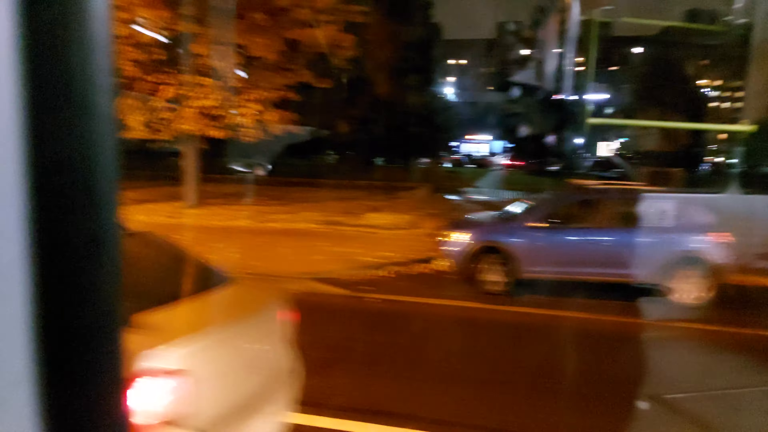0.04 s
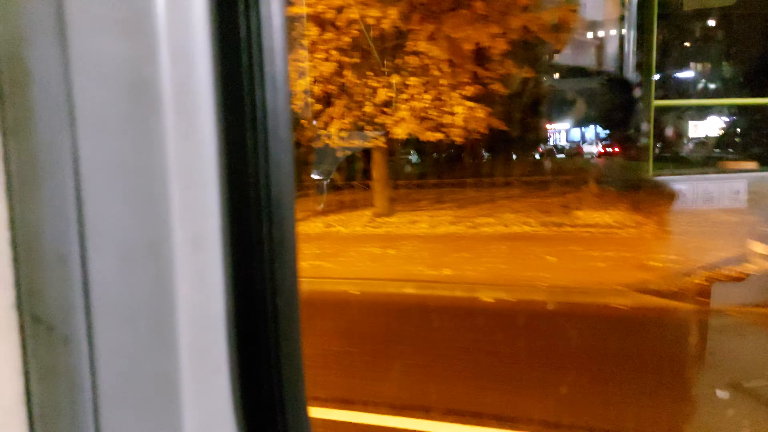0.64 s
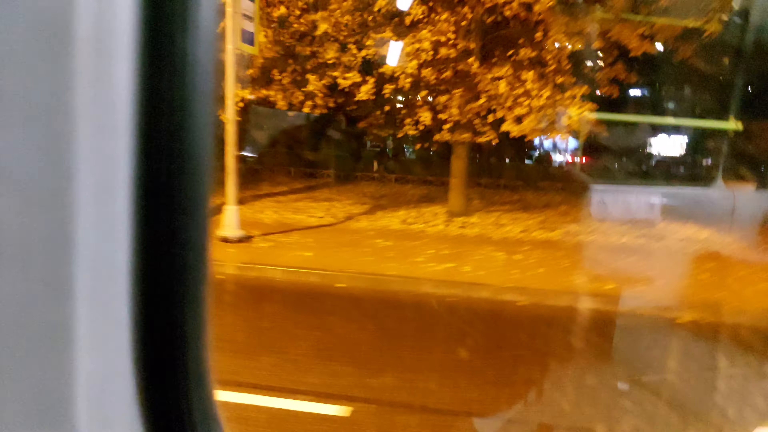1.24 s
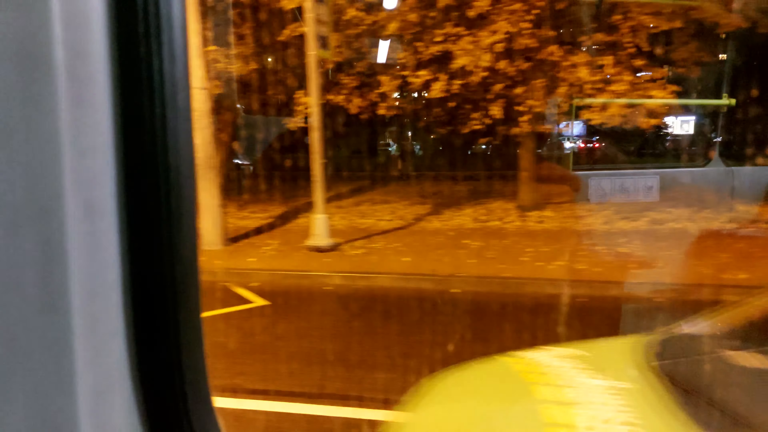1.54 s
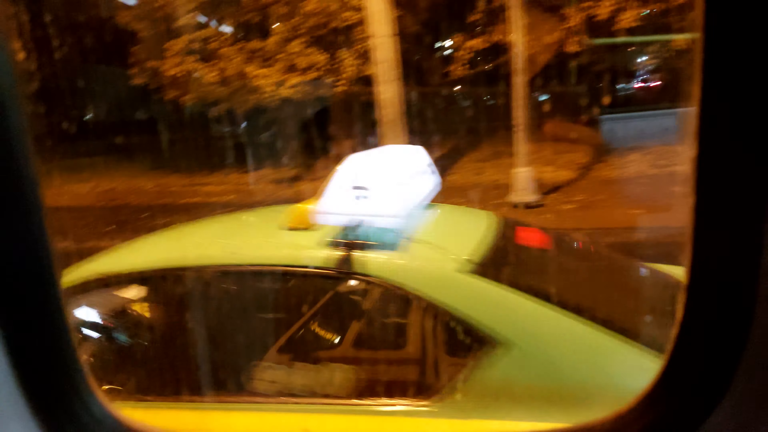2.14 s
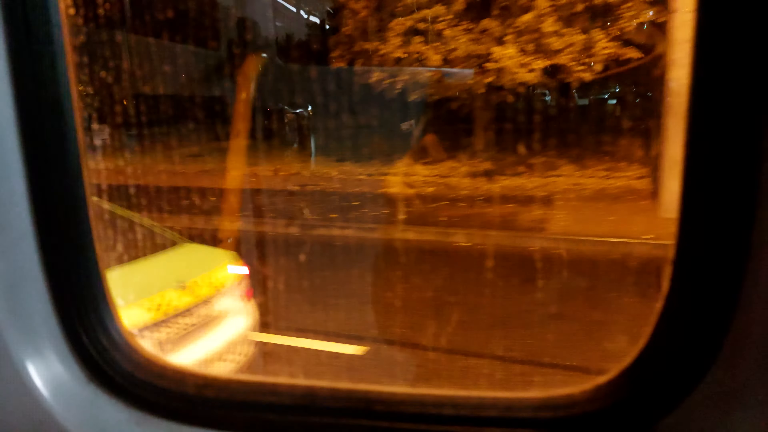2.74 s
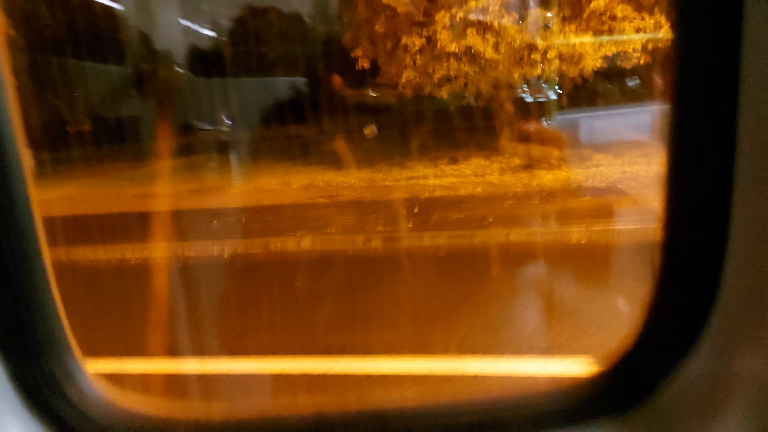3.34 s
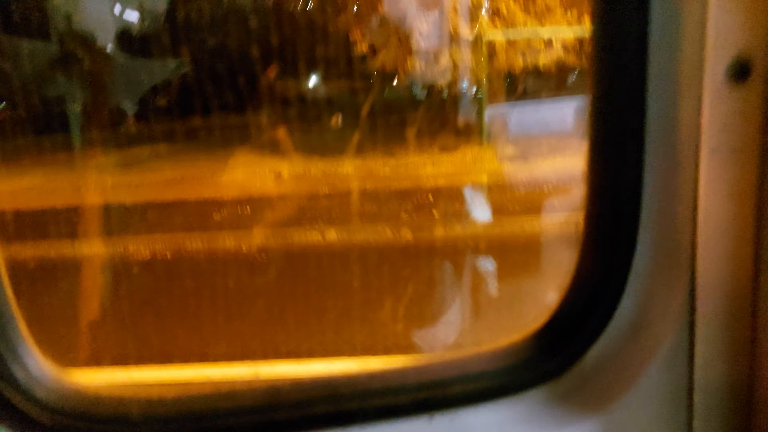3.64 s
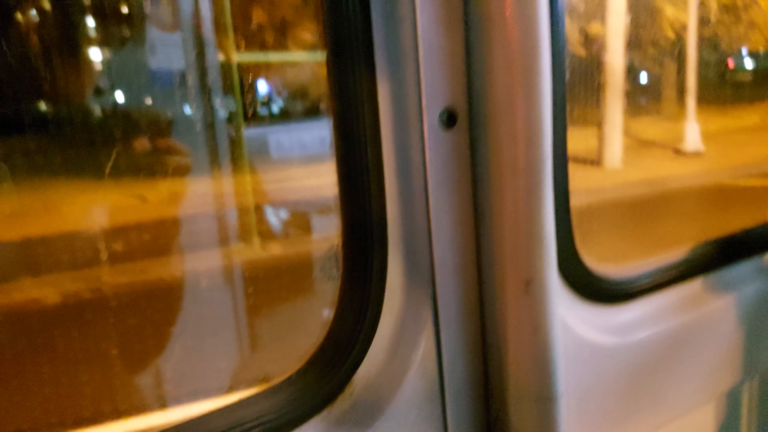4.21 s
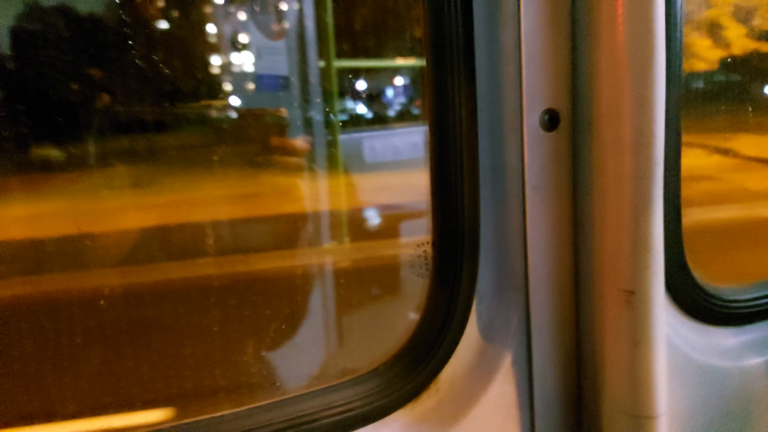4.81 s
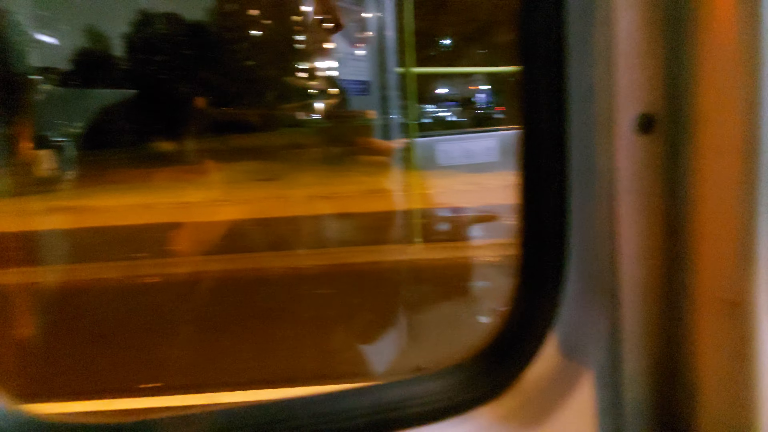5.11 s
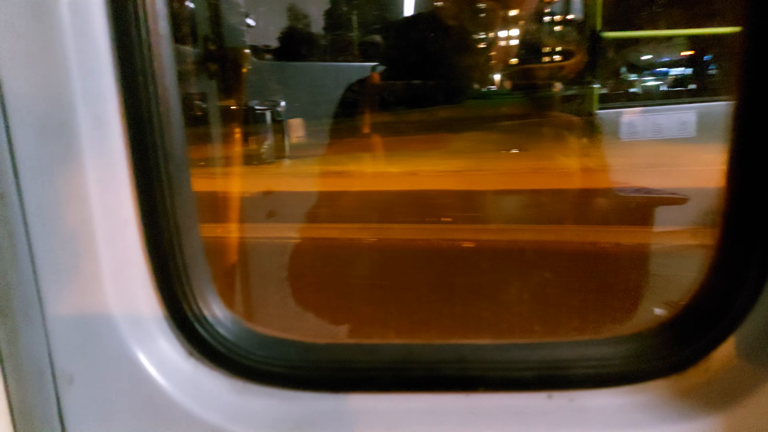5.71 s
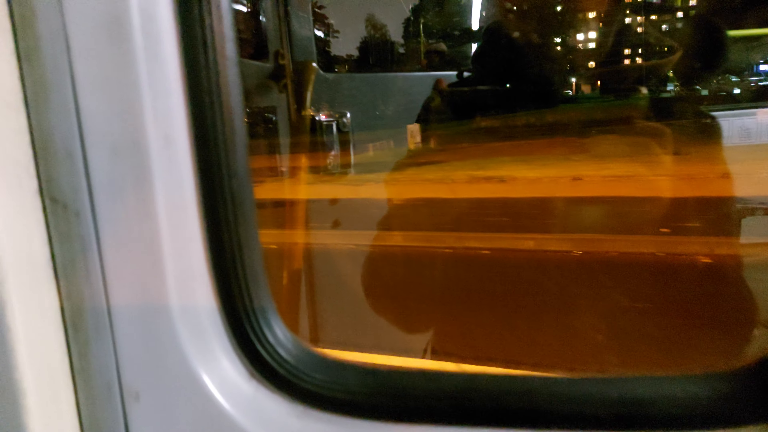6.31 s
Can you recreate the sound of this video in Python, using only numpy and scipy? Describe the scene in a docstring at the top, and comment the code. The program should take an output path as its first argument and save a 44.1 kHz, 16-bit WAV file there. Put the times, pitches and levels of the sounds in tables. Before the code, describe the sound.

Inside a slowing tram, a booming whine falls over rumbling wheels while loose metal rattles, until the brakes start to squeal.

```python
"""A falling whine booms over the rumble of wheels, heard inside a tram that slows for a stop.
The whine comes from the drive and swells wherever its pitch makes the tram's body ring. A fan hums,
loose metal fittings buzz and clack, and bumps in the track thud. Sliding wheels sing briefly and
a car passes outside. At the end the brakes scrape and begin to squeal.
The small, hard cabin smears every knock with quick echoes."""
import sys
import numpy as np
from scipy import signal
from scipy.fft import rfft, irfft
from scipy.io import wavfile

SR = 44100
rng = np.random.default_rng(int(sys.argv[2]) if len(sys.argv) > 2 else 0)


def file_out(sig):
    """Save sig as 16-bit WAV at sys.argv[1]."""
    # one column per channel
    cols = np.atleast_2d(sig).T
    # limit, then scale
    lim = np.clip(cols, -1, 1)
    pcm = np.round(lim * 32767).astype(np.int16)
    wavfile.write(sys.argv[1], SR, pcm)


N = 289296
T = np.arange(N) / SR
FREQS = np.fft.rfftfreq(N, 1 / SR)

# The drive shaft as the tram brakes, coasts and brakes again. Each row: time in seconds, turns a second.
SHAFT_SPEED = [(0, 113.1), (2.1, 90.7), (2.8, 84), (3.8, 81.7), (4.05, 77.38), (4.55, 72.44), (5.3, 67.4),
               (6.56, 57.05)]
# The tone of a panel's crack and of the brakes' scrape. Each row: frequency in Hz, level in dB.
CRACK_SPECTRUM = [(600, -22), (2150, -11), (2450, 4), (2800, 5), (3250, -4), (3950, 1), (5500, -6),
                  (7200, -4), (8600, -9), (11500, -7), (15500, -16)]


def undb(db):
    """Turn decibels into a number to multiply by."""
    return 10 ** (np.asarray(db) / 20)


def unit(x):
    """Scale a signal to an average (rms) strength of 1."""
    return x / np.sqrt(np.mean(x ** 2))


def over_time(rows):
    """Join (seconds, value) points into one value for every sample."""
    return np.interp(T, *np.transpose(rows))


def over_pitch(rows):
    """Join (Hz, value) points into one value for every frequency, with octaves evenly spaced."""
    hz, value = np.transpose(rows)
    return np.interp(np.log(FREQS + 1), np.log(hz), value)


def shape(x, response):
    """Filter a signal: multiply each frequency by its own gain."""
    return irfft(rfft(x) * response, N)


def resonance(hz, width):
    """The filter of something that rings at one pitch, with gain 1 at that pitch."""
    return 1j * FREQS * width / (hz ** 2 - FREQS ** 2 + 1j * FREQS * width)


def wander(rate):
    """A smooth random curve of strength 1 that changes about rate times a second."""
    steps = rng.standard_normal(N // 16 + 2)
    hz = np.fft.rfftfreq(len(steps), 16 / SR)
    slow = irfft(rfft(steps) * np.exp(-(hz / rate) ** 2) * (hz > 0), len(steps))
    return unit(np.interp(T, np.linspace(0, T[-1], len(slow)), slow))


def cabin_noise(response):
    """Filtered noise from all sides: left and right are alike in the bass, unlike in the treble."""
    # Each row: frequency in Hz, how alike left and right are (1 is the same, 0 is unrelated).
    likeness = [(60, 1), (130, 0.93), (260, 0.79), (500, 0.45), (1000, -0.077), (2000, -0.19),
                (15000, -0.016)]
    alike = np.clip(over_pitch(likeness), -.99, .995)
    mid = shape(rng.standard_normal(N), response * np.sqrt(1 + alike))
    side = shape(rng.standard_normal(N), response * np.sqrt(1 - alike))
    return unit(np.array([mid + side, mid - side]))


def contacts(rate, spread_db):
    """Tiny hits at random moments, about rate a second, a few much harder than the rest."""
    chance = rng.random(N) * SR / rate
    hit = np.flatnonzero(chance < 1)
    impacts = np.zeros(N)
    impacts[hit] = (-1.) ** hit * undb(spread_db * np.minimum(-np.log(chance[hit]), 4))
    return unit(impacts)


def cabin_echo(x, direct, fade_s=0.26):
    """The direct sound, then dense echoes from glass and panels that fall 60 dB in fade_s."""
    t = T[:SR // 2]
    tail = rng.standard_normal((2, len(t))) * undb(-60 * t / fade_s)
    tail /= np.sqrt(np.sum(tail ** 2, axis=1, keepdims=True))
    tail[:, 0] += direct
    return signal.fftconvolve(x[None], tail, axes=1)[:, :N] / np.hypot(1, direct)


def rolling(db, per_octave_db, rough_share, cruise_hz=90):
    """The gain of a sound that grows with speed and with the roughness of the rails."""
    # The track turns smoother near the stop. Each row: time in seconds, roughness in dB.
    roughness = [(0, -0.5), (2, -.5), (4.0, 0.5), (4.6, -2), (5.3, -5.5), (6.0, -2.5), (6.56, -3.5)]
    octaves = np.log2(over_time(SHAFT_SPEED) / cruise_hz)
    return undb(db + per_octave_db * octaves + rough_share * over_time(roughness))


def boom(pitch):
    """The gain of a drive tone: it swells as it crosses a pitch at which the tram's body rings."""
    # Each row: ringing pitch in Hz, width in Hz, level in dB of a tone at that pitch.
    body_modes = [(63.2, 5.8, -18), (67.4, 8.4, -18.5), (125.4, 9.9, -23), (135, 9, -28.5),
                  (149.1, 4.8, -16), (152.5, 6.4, -14.5), (172.84, 10.2, -19.5), (197, 4.3, -25),
                  (211.1, 7.3, -20), (221.5, 23, -17), (359, 40, -42), (471, 40, -47), (629, 30, -43)]
    gains = [undb(db) / (1 + (2 * (pitch - hz) / width) ** 2) for hz, width, db in body_modes]
    return np.sqrt(sum(gain ** 2 for gain in gains))


def drive(flutter_db=2.3, gear_ratio=6.33, gear_blur=.7):
    """Whine, drone and gear tone fall with speed; the shaking wheel frame makes them flutter."""
    speed = over_time(SHAFT_SPEED)
    phase = 2 * np.pi * np.cumsum(speed) / SR
    whine = boom(2 * speed) * undb(flutter_db * wander(11.3)) * np.sin(2 * phase + 0.056 * wander(9.7))
    drone = boom(speed) * undb(flutter_db * wander(23)) * np.sin(phase)
    gear = boom(gear_ratio * speed) * np.sin(gear_ratio * phase + gear_blur * wander(4.2))
    return np.sqrt(2) * (whine + drone + gear)


def wheels(flicker_db=1.34):
    """Rough rails shake the floor; the roar through the air fades faster as the tram slows."""
    # The low rumble and the brighter roar. Each row: frequency in Hz, level in dB.
    rumble_spectrum = [(22, -51), (31, -15.5), (40, -6.5), (52, -4.5), (68, 6.5), (88, -4.5), (110, -0.5),
                       (155, -3), (215, -5), (300, -10), (400, -17), (560, -22), (720, -29.5),
                       (1200, -62.5)]
    roar_spectrum = [(300, -29), (560, -43), (730, 1.5), (950, 1), (1400, -4), (2200, -5.5), (3000, -16.5),
                     (5000, -26), (9000, -27), (15500, -46)]
    rumble = cabin_noise(undb(over_pitch(rumble_spectrum)))
    rumble *= rolling(db=-19.5, per_octave_db=4.0, rough_share=0.73)
    roar = cabin_noise(undb(over_pitch(roar_spectrum)))
    roar *= rolling(db=-42.0, per_octave_db=8.5, rough_share=0.58)
    return rumble + roar * undb(flicker_db * wander(19))


def fan(waver=0.92):
    """The fan and the power converter hum with steady tones that waver a little."""
    # Each row: pitch in Hz, level in dB.
    hum_tones = [(151, -30.5), (176, -44.5), (219, -37), (296, -40.5), (877, -63)]
    hum = 0
    for hz, db in hum_tones:
        level = np.sqrt(2) * undb(db + 2 * wander(2.7))
        hum += level * np.sin(2 * np.pi * hz * T + waver * wander(3.07))
    return hum


def buzz(shake_db=1.5, trim_db=-7, sway_db=1.34):
    """Loose metal chatters in fits, more on rough track; each fitting also comes and goes by itself."""
    # How the fittings ring. Each row: pitch in Hz, width in Hz, relative level in dB.
    fitting_modes = [(2330, 560, 3), (3108, 44, 11), (3270, 10, 6), (4160, 510, 6), (4580, 360, 4.5),
                     (4700, 150, -7), (6500, 180, 7.5), (6830, 830, 0.5), (8370, 200, -3.5),
                     (9100, 120, -6), (10060, 690, -6.5), (12300, 300, -24)]
    # The rustle of trim and seals. Each row: frequency in Hz, level in dB.
    trim_spectrum = [(1200, -24), (2300, -3), (4300, -2.5), (7000, -3), (9000, -13), (11500, -8),
                     (15500, -30)]
    shake = undb(shake_db * wander(26))
    metal = 0
    for hz, width, db in fitting_modes:
        chatter = np.array([contacts(rate=1500, spread_db=1.5) for _ in range(2)])
        metal += shape(chatter * undb(db + sway_db * wander(5.6)), resonance(hz, width))
    ticks = contacts(rate=1800, spread_db=3.5)
    trim = cabin_echo(shape(ticks, undb(over_pitch(trim_spectrum))), direct=0.42)
    rattle = unit(metal) + undb(trim_db) * unit(trim)
    return rattle * shake * rolling(db=-47.0, per_octave_db=0.5, rough_share=1.37)


def clacks(clack_db=5, rise_s=.004):
    """Each knock is a quick run of tiny hits that draws a crack from a panel and rings a loose latch."""
    # Each row: start in seconds, relative crack and ring levels in dB, fade time in seconds.
    knocks = [(0.15, -32, -59, 0.019), (1.15, -35.5, -31.5, 0.018), (1.163, -43, -40.5, 0.031),
              (1.507, -36.5, -45, 0.017), (1.545, -44, -39, 0.018), (2.23, -35, -50, 0.028),
              (3.628, -27.5, -59, 0.018), (3.719, -38, -29.5, 0.025), (3.889, -46, -44, 0.045),
              (4.18, -40.5, -39, 0.028), (5.961, -36, -61, 0.011), (6.206, -49, -40, 0.006)]
    # How the latch rings. Each row: pitch in Hz, width in Hz, relative level in dB.
    latch_modes = [(2010, 740, -0.5), (3290, 24, 8), (4480, 110, -5), (4920, 120, 0.5), (6530, 190, 2.5),
                   (9600, 24, 3), (12550, 80, -10)]
    crack, ring = np.zeros(N), np.zeros(N)
    for start, crack_db, ring_db, fade_s in knocks:
        age = np.maximum(T - start, 0)
        blow = (1 - np.exp(-age / rise_s)) * np.exp(-age / fade_s)
        crack += undb(crack_db) * blow
        ring += undb(ring_db) * blow
    chatter = contacts(rate=4000, spread_db=6.0)
    latch = sum(undb(db) * resonance(hz, width) for hz, width, db in latch_modes)
    sound = shape(chatter * crack, unit(undb(over_pitch(CRACK_SPECTRUM))))
    sound += shape(chatter * ring, latch / np.sqrt(np.mean(np.abs(latch) ** 2)))
    return undb(clack_db) * cabin_echo(sound, direct=0.14)


def bounces(swell_s=0.04):
    """A bump in the track makes the tram's body swing at a low pitch for a few cycles."""
    # Each row: loudest moment in seconds, pitch in Hz, peak level in dB.
    bumps = [(0.354, 66, -9), (0.69, 72.4, -12.5), (1.171, 45, -20), (1.928, 70, -16), (2.719, 71.5, -14.5),
             (3.178, 68, -16.5), (3.562, 71.6, -14.5), (3.76, 52.6, -15)]
    thuds = 0
    for peak_s, hz, db in bumps:
        swell = undb(db) * np.exp(-((T - peak_s) / swell_s) ** 2)
        thuds += swell * np.sin(2 * np.pi * hz * (T - peak_s))
    return thuds


def wheel_ring(hz, width):
    """Uneven slips keep a wheel ringing around one pitch, heard from all sides."""
    return unit(shape(rng.standard_normal((2, N)), resonance(hz, width) ** 2))


def wheel_squeals(fade_db=16):
    """Wheels slide a little on the rail and sing for a moment."""
    # Each row: start, full strength, fade start and end in seconds, pitch and width in Hz, level in dB.
    slides = [(.8, .87, .95, 1.05, 3115, 60, -56), (.92, .98, 1.0, 1.06, 11080, 260, -44),
              (1.83, 1.88, 2.0, 2.2, 10960, 380, -52.5), (2.55, 2.75, 3.1, 3.5, 4080, 200, -56),
              (2.68, 2.75, 2.9, 3.05, 6500, 180, -52), (3.38, 3.45, 3.55, 3.62, 3115, 70, -56),
              (5.66, 5.8, 5.97, 6.25, 4795, 130, -47.5), (5.96, 5.98, 6.02, 6.16, 2100, 600, -51)]
    sound = 0
    for start, full, fading, end, hz, width, db in slides:
        swell = undb(db + np.interp(T, [start, full, fading, end], [-fade_db, 0, 0, -fade_db]))
        sound += swell * (T > start) * (T < end) * wheel_ring(hz, width)
    return sound


def passing_car(nearest_s=2.44, passing_s=0.56, tyres_db=-44.0, tread_hz=1080, width_hz=700):
    """The tyres of a car in the next lane swell and fade behind the glass."""
    distance = np.hypot(1, (T - nearest_s) / passing_s)
    return undb(tyres_db) * cabin_noise(resonance(tread_hz, width_hz) ** 2) / distance


def brakes(squeal_hz=5945, width_hz=190, squeal_db=-47.5, octave_db=-6, rasp_db=1.0, full_s=6.02):
    """The brake shoes grab and scrape, then stick and slip into a raspy squeal that builds and holds."""
    # The shoes grip ever harder. Each row: moment of letting go in seconds, level in dB, rise in dB/s.
    grabs = [(6.21, -47.5, 35), (6.335, -51, 400)]
    let_go_db_per_s, build_db_per_s = 400, 90
    scrape = unit(shape(contacts(rate=600, spread_db=2.5), undb(over_pitch(CRACK_SPECTRUM))))
    grip = sum(undb(db - np.maximum(rise * (s - T), let_go_db_per_s * (T - s))) for s, db, rise in grabs)
    squeal = wheel_ring(squeal_hz, width_hz) + undb(octave_db) * wheel_ring(2 * squeal_hz, 2 * width_hz)
    build = undb(squeal_db - build_db_per_s * np.maximum(full_s - T, 0))
    rasp = unit(undb(rasp_db * wander(100)))
    return cabin_echo(grip * scrape, direct=0.39) + build * rasp * squeal


def scene():
    """All the sounds together, heard from a window seat."""
    # Each row: frequency in Hz, how much louder the left is than the right in dB.
    balance = [(60, -1.6), (130, -0.8), (260, 0.3), (500, -1), (1000, -0.5), (2000, 1), (4500, -4),
               (9000, -1), (14000, -.3)]
    sound = drive() + wheels() + fan() + buzz() + clacks() + bounces()
    sound += wheel_squeals() + passing_car() + brakes()
    edge_fade = signal.windows.tukey(N, .002)
    side_gains = undb(np.outer([1, -1], over_pitch(balance)) / 2)
    return shape(sound * edge_fade, side_gains)


def record(dry):
    """Cut away the very highest treble."""
    top_hz = 15720
    return signal.sosfilt(signal.ellip(10, .1, 90, top_hz, fs=SR, output="sos"), dry)


dry = scene()
out = record(dry)
file_out(out)
```